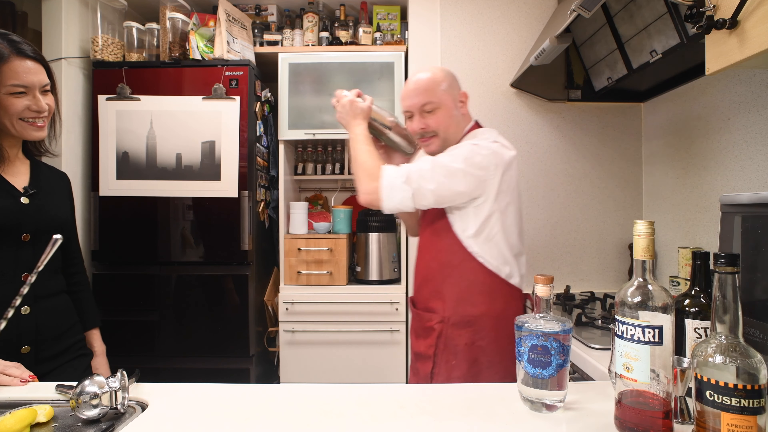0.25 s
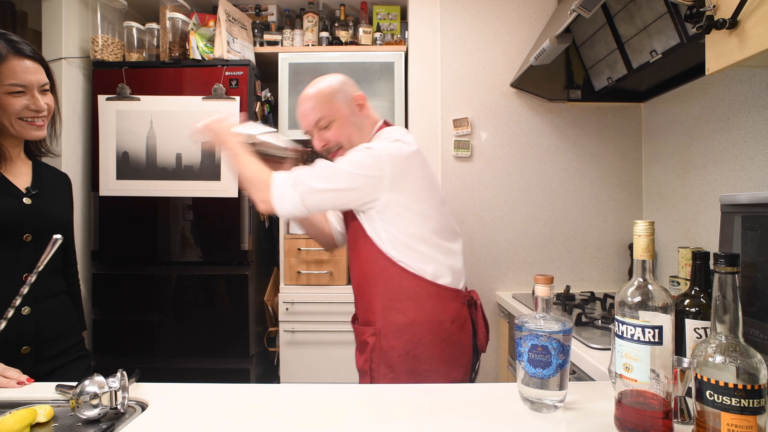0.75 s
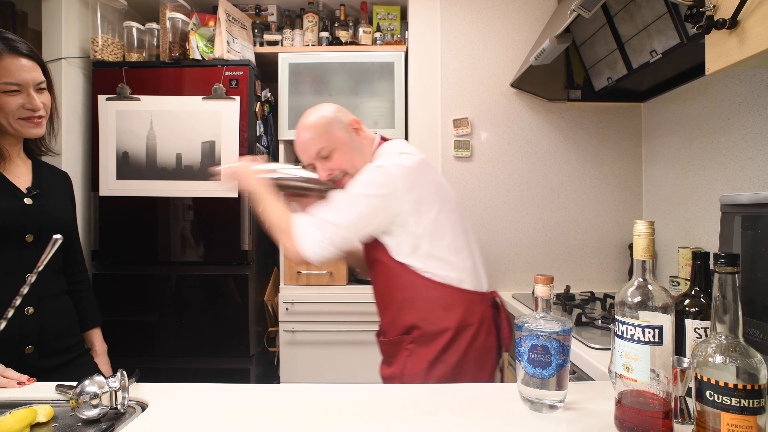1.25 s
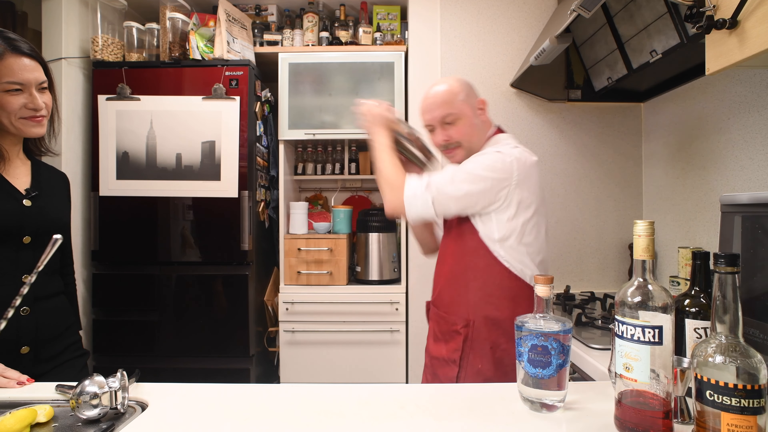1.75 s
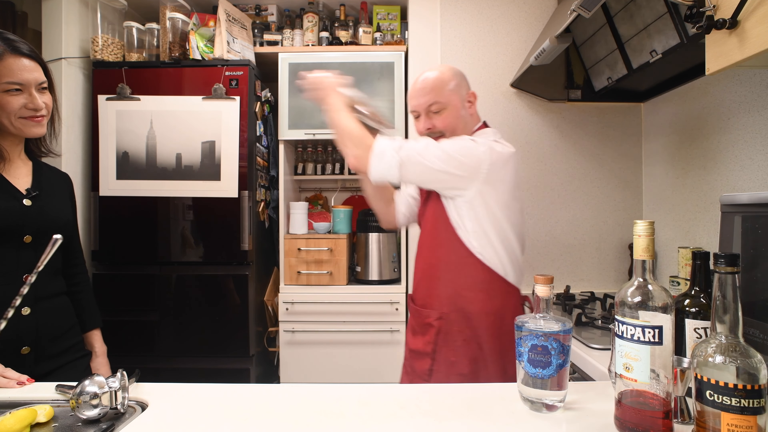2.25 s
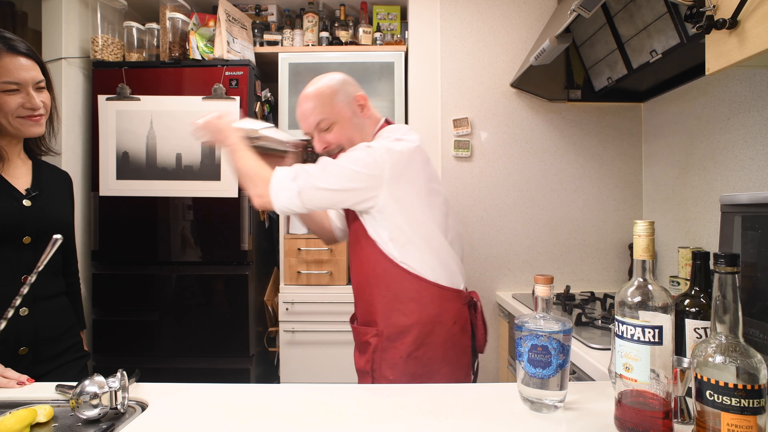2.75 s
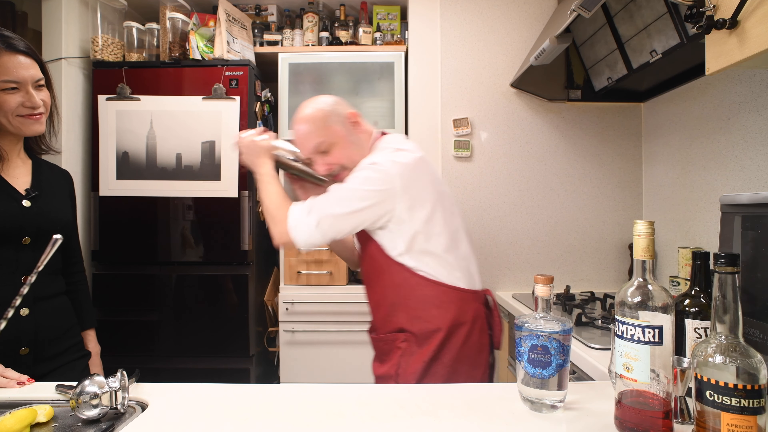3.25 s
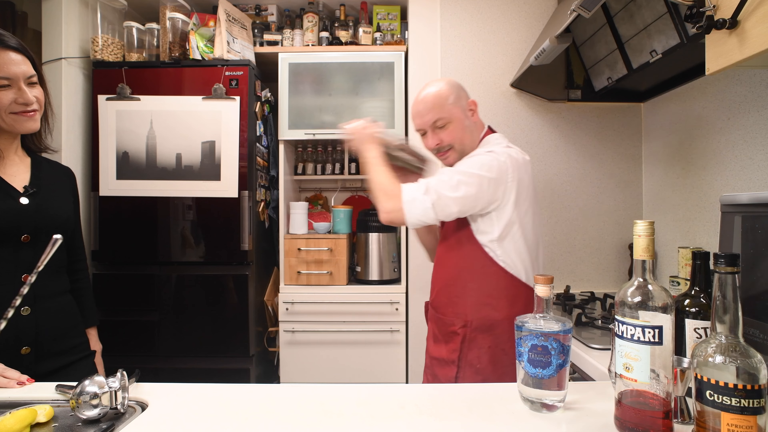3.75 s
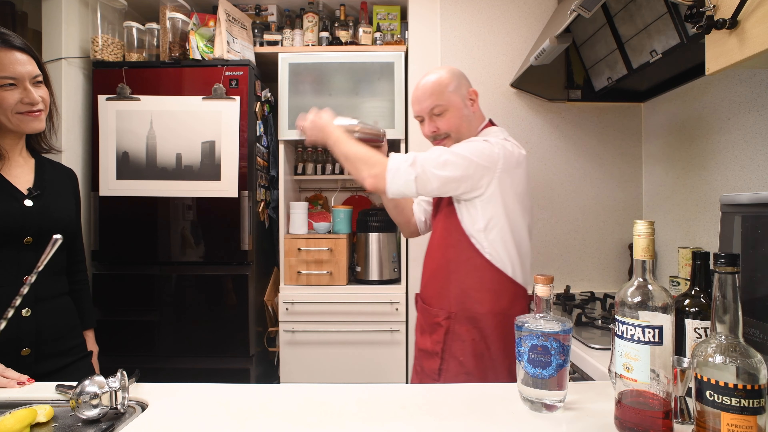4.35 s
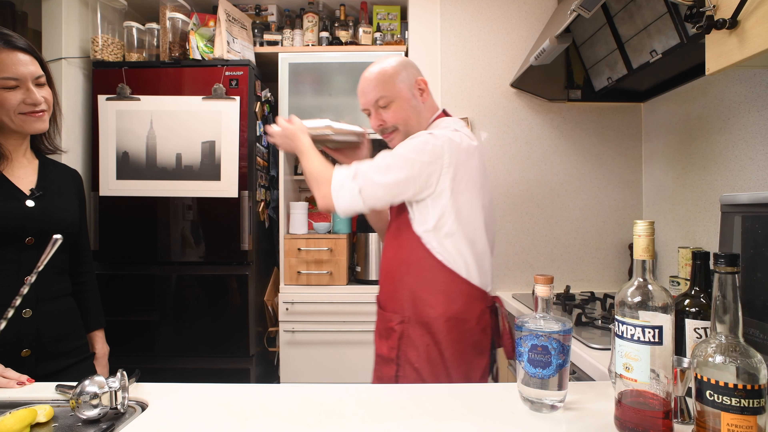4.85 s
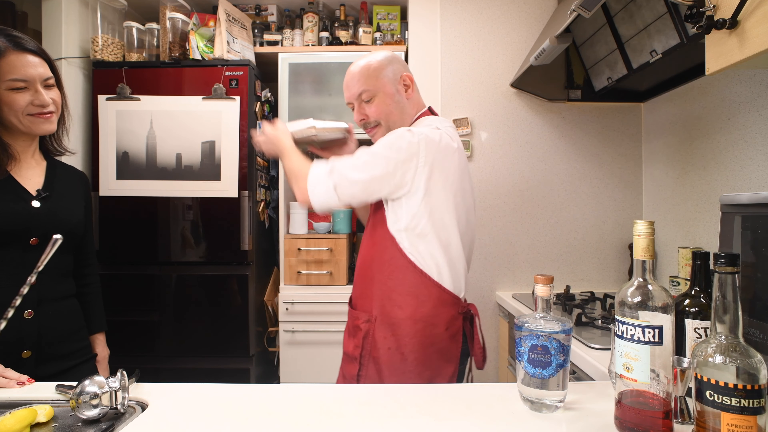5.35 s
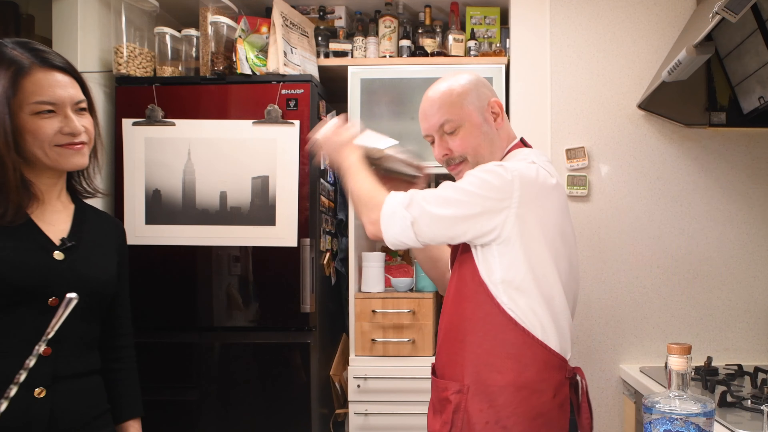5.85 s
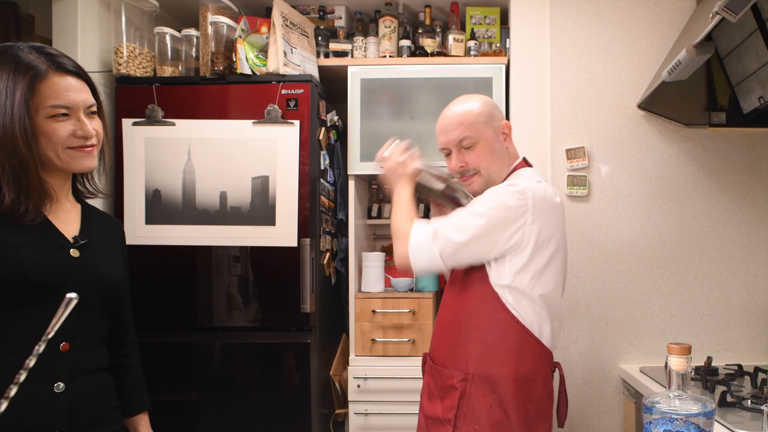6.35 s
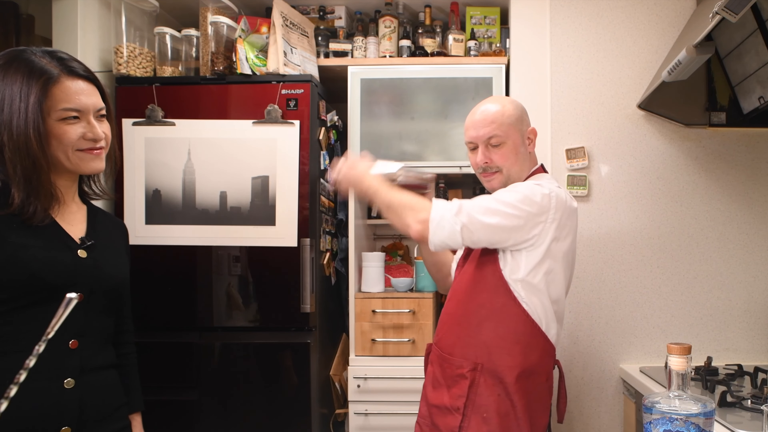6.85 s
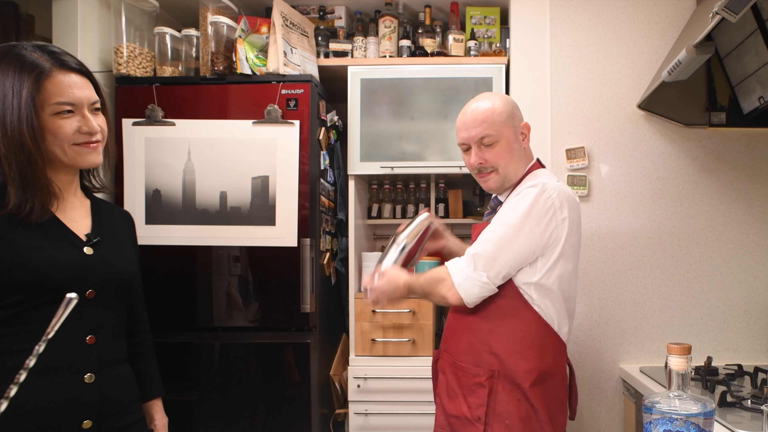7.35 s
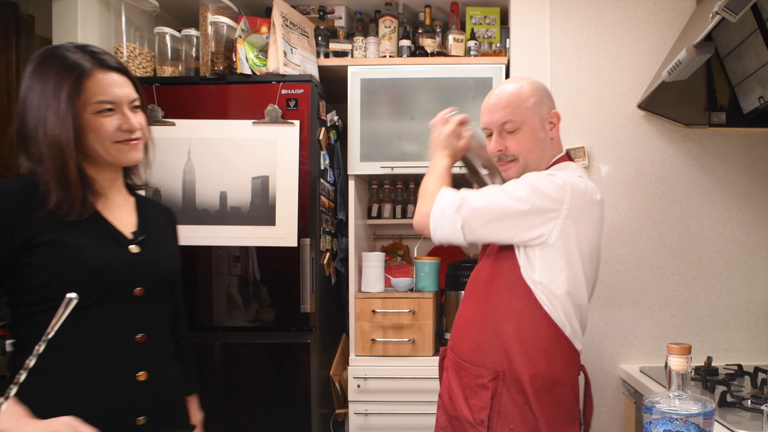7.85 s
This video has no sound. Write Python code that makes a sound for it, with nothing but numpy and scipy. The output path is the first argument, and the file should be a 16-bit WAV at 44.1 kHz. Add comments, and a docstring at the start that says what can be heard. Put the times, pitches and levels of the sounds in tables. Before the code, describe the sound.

A steel shaker full of ice is shaken furiously, close to ten blows a second, each a dull metallic clank followed by a quick crunchy rattle, with liquid sloshing between. After about four seconds the blows become more uneven and gaps open; from six seconds it is lighter and sparser, with a few late stronger clacks. Small hard-walled kitchen, short bright reflections, stereo microphone slightly overloaded on the loudest hits.

```python
"""A hand-held steel cocktail shaker full of ice rattles in a small kitchen, hard at first, then easing off.
Each blow is a first contact and a rattle of lesser ones; each contact rings damped modes of the steel shell
and sets off short noise bursts for the crack of ice on ice. Between blows the ice rolls and the drink sloshes
as noise. Hard walls answer with decaying noise tails, over soft low bumps and low room air.
The loudest blows overload the stereo microphone."""
import sys
import numpy as np
from scipy import signal
from scipy.fft import rfft, irfft, next_fast_len
from scipy.io import wavfile

SR = 44100
rng = np.random.default_rng(int(sys.argv[2]) if len(sys.argv) > 2 else 0)


def wrap_up_sound(samples):
    """Save the sound to the file named by the first command line argument, as 16-bit audio."""
    columns = np.atleast_2d(samples).T
    # keep every value between -1 and 1, then stretch to whole-number steps
    tamed = np.clip(columns, -1, 1)
    steps = np.round(tamed * 32767).astype(np.int16)
    wavfile.write(sys.argv[1], SR, steps)


N = 357210  # samples in the scene


def amp(db):
    """Decibels to gain."""
    return 10 ** (np.asarray(db) / 20)


def unit(x):
    """Scaled to rms 1."""
    return x / np.sqrt(np.mean(x ** 2) + 1e-20)


def along(points, hz):
    """(Hz, value) points read on a log frequency axis."""
    point_hz, value = np.transpose(points)
    return np.interp(np.log(hz + 1), np.log(point_hz + 1), value)


def curve(rows, s):
    """A (s, value) table read at times s."""
    return np.interp(s, *np.transpose(rows))


def filtered(x, response):
    """x shaped by a complex response of frequency."""
    size = next_fast_len(N + SR // 2)
    spectrum = rfft(x, size) * response(np.fft.rfftfreq(size, 1 / SR))
    return irfft(spectrum, size)[..., :N]


def train(s, size):
    """Impulses of the given sizes at times s."""
    sample = np.clip(np.round(s * SR).astype(int), 0, N)
    return np.bincount(sample, size, N + 1)[:N]


# Blows of the ice pile, each followed by a rattle; low_db and treble_db are the lows and treble against level_db,
# and only their distance from the median blow is used:
# start_s [s], level_db [dB], rattle_t60_s [s], low_db [dB], treble_db [dB]
BLOWS = [(0.027, 1, 0.38, -19, -15), (0.139, 4.5, 0.29, -21.5, -18.5), (0.253, 0.5, 0.26, -15, -14),
         (0.298, -2.5, 0.29, -20, -20.5), (0.343, -4.5, 0.48, -19, -6), (0.378, -2, 0.2, -17.5, -16.5),
         (0.44, -2, 0.53, -12, -10.5), (0.536, -5, 0.35, -27, -14), (0.579, 0, 0.3, -14.5, -11.5),
         (0.64, -4.5, 0.3, -22, -15.5), (0.674, 0.5, 0.23, -17, -11), (0.754, -10, 0.35, -21, -11),
         (0.777, -8.5, 0.49, -13, -8), (0.8, -3.5, 0.89, -20, -15), (0.878, -3.5, 0.43, -23, -14.5),
         (0.899, -4, 0.17, -22, -20), (0.962, -11.5, 0.32, -26, -14), (0.992, -3, 6.0, -18, -12),
         (1.015, -2, 0.28, -21, -15.5), (1.053, -2.5, 0.83, -13, -16.5), (1.086, 0, 0.22, -13, -10),
         (1.166, -1.5, 2.3, -18.5, -14.5), (1.27, -4, 1.2, -20, -12), (1.3, 1, 0.39, -22.5, -20.5),
         (1.41, 2.5, 0.18, -17, -13.5), (1.47, -3, 0.73, -22, -10.5), (1.503, 1.5, 0.36, -21.5, -13.5),
         (1.595, -1.5, 0.36, -20, -14.5), (1.622, 1.5, 0.59, -23, -13.5), (1.696, 5, 0.24, -14, -15.5),
         (1.786, -15, 0.34, -10, -10.5), (1.814, 1, 0.83, -16.5, -14), (1.93, 1, 0.27, -17.5, -14.5),
         (2.016, -10, 0.28, -19, -11.5), (2.044, -1, 0.37, -16, -12), (2.134, 2, 0.4, -14.5, -14.5),
         (2.231, -4, 0.59, -19, -12), (2.255, 3.5, 0.38, -16.5, -12.5), (2.354, 0, 1.5, -18, -14),
         (2.378, 7, 0.3, -17.5, -25.5), (2.499, 1, 0.36, -11.5, -14), (2.591, -5, 0.14, -13, -18),
         (2.62, -0.5, 0.26, -19, -12.5), (2.729, -12.5, 0.28, -22, -13), (2.751, -3.5, 0.76, -13.5, -11.5),
         (2.797, 0.5, 0.18, -26, -19), (2.833, -6.5, 6.0, -34, -18), (2.888, 2.5, 0.41, -23.5, -19),
         (3.007, 0, 0.97, -15, -16), (3.043, -0.5, 0.21, -16, -7.5), (3.137, -9, 6.0, -16.5, -15),
         (3.165, 0, 0.39, -20, -15.5), (3.29, -21, 2.6, -11, -16), (3.312, -7, 0.37, -19, -11),
         (3.338, 1, 0.17, -19.5, -19), (3.36, 2, 0.22, -18, -17.5), (3.423, -4, 6.0, -14, -13.5),
         (3.447, 2, 0.5, -19.5, -17.5), (3.581, -5.5, 0.48, -13, -18), (3.612, 1.5, 0.8, -26, -17),
         (3.773, -5, 0.36, -11.5, -19.5), (3.853, -20, 1.5, -26, -29), (3.904, -15, 6.0, -11.5, -4),
         (3.937, -3, 6.0, -13.5, -15.5), (3.992, -3.5, 0.11, -18, -12.5), (4.029, -13, 1.3, -22.5, -20),
         (4.077, -4, 0.4, -6.5, -14.5), (4.115, -8, 0.12, -8, -4), (4.217, -26, 6.0, -18, -12),
         (4.254, -14.5, 6.0, -9.5, -11), (4.289, -3, 0.34, -16, -11.5), (4.382, -15, 0.12, -22, -34),
         (4.408, -16, 6.0, -14, -13), (4.433, 2, 0.23, -25, -18), (4.466, 0.5, 0.39, -21, -23.5),
         (4.526, -6, 0.2, -16, -18), (4.621, -7.5, 0.22, -13, -12.5), (4.654, -13, 0.57, -19, -8.5),
         (4.699, 1.5, 0.27, -19, -17), (4.824, -16, 0.54, -14, -25), (4.869, -5, 6.0, -20, -17),
         (4.908, -2, 0.39, -24, -20), (4.944, -6, 0.23, -15.5, -17.5), (5.019, -24, 0.54, -17, -32),
         (5.108, -23, 0.86, -19, -5.5), (5.158, -8.5, 6.0, -16, -14), (5.183, 0, 0.28, -22, -19),
         (5.24, -10.5, 0.26, -17, -19), (5.327, -21, 0.4, -22, -18), (5.381, -22.5, 0.4, -16, -15),
         (5.419, -8, 0.22, -13, -17.5), (5.449, -8.5, 0.29, -17, -20.5), (5.53, -26, 0.5, -16, -27),
         (5.609, -16, 0.2, -13, -10.5), (5.665, -15, 0.34, -11, -17), (5.702, -3, 0.41, -16, -19.5),
         (5.951, -25, 0.06, -18, -36), (5.992, -19, 0.072, -15, -33), (6.022, -18.5, 0.4, -13.5, -19.5),
         (6.05, -6.5, 0.26, -16, -23.5), (6.088, -9.5, 0.43, -10.5, -19), (6.126, -7.5, 0.24, -13, -15),
         (6.254, -24.5, 0.13, -3, -6.5), (6.316, -14.5, 0.11, -20, -18), (6.372, -24.5, 0.19, -9, -21),
         (6.4, -29, 0.14, -16, -17), (6.441, -48, 2.4, -7, -4), (6.482, -15.5, 0.12, -10, -15),
         (6.521, -23, 6.0, -13, -17), (6.545, -10.5, 0.28, -11, -16), (6.622, -17, 6.0, -20, -16),
         (6.644, -8, 0.38, -22, -17), (6.726, -12.5, 0.32, -16.5, -19), (6.77, -17, 0.12, -13, -16),
         (6.834, -10.5, 0.053, -25, -29), (6.865, -16.5, 0.19, -21, -26), (6.897, -20, 0.18, -17, -29),
         (6.971, -10.5, 0.083, -19, -24), (7.082, -17.5, 6.0, -10, -15.5), (7.107, -11, 0.16, -14, -9.5),
         (7.131, -9.5, 0.26, -11, -16), (7.164, -7, 0.25, -14, -15), (7.359, -21, 0.047, -20, -19.5),
         (7.389, -21, 0.15, -16, -15.5), (7.525, -27, 0.16, -3, -21), (7.558, -26.5, 0.13, -15, -16),
         (7.612, -28, 0.56, -13, -27), (7.635, -30, 1.0, -12, -32), (7.678, -19, 0.077, -17, -18),
         (7.76, -29.5, 0.34, -15, -13.5), (7.812, -20.5, 0.2, -17, -18), (7.845, -25.5, 0.19, -14, -5),
         (7.914, -5.5, 0.33, -16, -14), (7.972, -9.5, 0.24, -18, -16.5), (8.082, -29, 0.22, -9, -31)]
# Usual drive of the low, body, cap and treble parts of the shell: drive_db [dB]
PARTS_DB = [-9.5, -1, -8, -6.5]
# How far each of the four parts follows a bright blow: share [dB per dB]
FOLLOWS_TREBLE = [0, 0.22, 0.53, 0.96]
FOLLOWS_LOW = 0.83  # how far the low part follows a deep blow, dB per dB
SCATTER_DB = 2.5  # chance scatter of the parts from blow to blow
FIRST_DB, RATTLE_DB = -2.5, -7.5  # first contact, and base level of the rattle, against the blow's level
STRAGGLE_DB = 12  # extra loss per rattle length once the rattle is over
GAP_SHARE, LONGEST_S = 0.55, 0.05  # a rattle fills this share of the wait for the next blow, up to a limit
USUAL_RATTLE_S = 0.024


def rattle_contacts(count, spread_db, reach):
    """Ice thrown against one end: time, dB, blow number and the drive of each shell part, per contact."""
    s, level_db, t60, low_db, treble_db = np.transpose(BLOWS)[..., None]
    length = np.minimum(GAP_SHARE * np.diff(s, axis=0, append=N / SR), LONGEST_S)
    draw = rng.random((len(s), 2, count))
    # one contact in each equal slot, in rattle lengths; the first is the blow itself
    when = reach * (np.arange(count) + draw[:, 0]) / count
    when[:, 0] = 0
    rattle_db = RATTLE_DB - 60 * length * np.minimum(when, 1) / t60
    # a longer rattle spreads the same number of contacts wider, so each must be stronger
    rattle_db = rattle_db + 10 * np.log10(length / USUAL_RATTLE_S)
    rattle_db = rattle_db - STRAGGLE_DB * np.maximum(when - 1, 0)
    rattle_db = rattle_db - spread_db * np.log(draw[:, 1] + 0.027)
    contact_db = level_db + np.where(when == 0, FIRST_DB, rattle_db)
    scatter = SCATTER_DB * rng.standard_normal((len(s), len(PARTS_DB)))
    parts_db = PARTS_DB + (treble_db - np.median(treble_db)) * FOLLOWS_TREBLE + scatter
    parts_db[:, :1] += FOLLOWS_LOW * (low_db - np.median(low_db))
    rows = [s + length * when, contact_db, np.arange(len(s))[:, None], *parts_db.T[..., None]]
    return [np.broadcast_to(row, when.shape).ravel() for row in rows]


# Ice rolling between blows, before it settles: time_s [s], level_db [dB]
TUMBLE = [(0.0, -11.5), (1.17, -12.5), (2.1, -11), (2.6, -12.5), (2.73, -18.5), (2.84, -12.5), (3.41, -16),
          (3.56, -17), (3.72, -7), (3.85, -19.5), (4.3, -20.5), (4.6, -24), (5.68, -26), (5.92, -30.5),
          (6.48, -45), (6.68, -32), (7.4, -33.5), (7.62, -41.5), (8.1, -33)]
SETTLE_DB_PER_S, SETTLE_MOST_DB = 99, 4.5  # rolling quietens after each blow, down to a limit


def rolling_db(t):
    """Level of the rolling ice: the slow curve, settling since the latest blow."""
    s = np.transpose(BLOWS)[0]
    since = t - s[np.maximum(np.searchsorted(s, t) - 1, 0)]
    return curve(TUMBLE, t) - np.clip(SETTLE_DB_PER_S * since, 0, SETTLE_MOST_DB)


# Rolling ice's drive of the low, body, cap and treble parts of the shell: drive_db [dB]
ROLL_PARTS_DB = [-7.5, 0, -7, -5]


def rolling_contacts(rate, spots, spread_db):
    """Loose ice touching the steel at random times, taking turns on a few spots."""
    s = rng.random(round(rate * N / SR)) * N / SR
    db = rolling_db(s) - spread_db * np.log(rng.random(len(s)) + 0.32)
    spot = len(BLOWS) + np.arange(len(s)) % spots
    return [np.broadcast_to(row, s.shape) for row in [s, db, spot, *ROLL_PARTS_DB]]


def contacts(count, rate, spread_db, reach):
    """Every touch of ice on steel, rattling or rolling: time, dB, blow or spot, dB for each shell part."""
    rattle = rattle_contacts(count, spread_db, reach)
    rolling = rolling_contacts(rate, count, spread_db)
    s, db, blow, *parts_db = [np.concatenate(pair) for pair in zip(rattle, rolling)]
    return s, db, blow, np.array(parts_db)


# Centres of the low, body, cap and treble parts of the shell: centre_hz [Hz]
PARTS_HZ = [600, 1600, 3000, 7000]


def part_share(hz):
    """How much of each frequency belongs to each part of the shell, cross-fading between centres."""
    return np.array([along(list(zip(PARTS_HZ, row)), hz) for row in np.eye(len(PARTS_HZ))])


def ring(push, hz, t60):
    """One damped mode: a two-pole resonator driven by impulses."""
    radius, angle = amp(-60 / t60 / SR), 2 * np.pi * hz / SR
    return signal.lfilter([0, radius * np.sin(angle)], [1, -2 * radius * np.cos(angle), radius ** 2], push)


# Modes of the hand-damped steel shell, each pulled flat or sharp as it plays:
# centre_pitch_hz [Hz], level_db [relative dB], t60_s [s]
SHELL = [(290, -5, .05), (395, 5, .07), (480, 4, .06), (570, 8, .05), (700, 8, .05), (860, 7, .04),
         (1080, 2, .05), (1270, 5, .05), (1480, 1, .045), (1680, 1, .05), (1850, 1, .045), (2300, -4, .02),
         (2780, 7, .035), (2940, 8, .035), (3250, 5, .03), (4740, -3, .007), (5050, -1, .008),
         (5700, -3, .006), (6600, -8, .004)]


def shell(s, db, blow, parts_db, spot_db, detune):
    """Each blow lands on its own spot; the drink inside pulls every mode flat or sharp."""
    sound = np.zeros(N)
    for hz, level_db, t60 in SHELL:
        spot = rng.uniform(-1, 1, blow.max() + 1)[blow]
        sharp = rng.integers(2, size=blow.max() + 1)[blow]
        mode_db = db + part_share(hz) @ parts_db + level_db - 19.5 + spot_db * spot
        # chance sign and strength for each contact
        size = amp(mode_db) * np.cos(np.pi * rng.random(len(s)))
        sound += ring(train(s, size * sharp), hz * (1 + detune), t60)
        sound += ring(train(s, size * (1 - sharp)), hz * (1 - detune), t60)
    return sound


# Colour of ice on ice and slosh: freq_hz [Hz], level_db [relative dB per Hz]
CRACK = [(150, -58), (250, -21), (354, -10), (555, 2), (1050, 8), (1300, 8.5), (2180, 3), (2880, 2),
         (3730, -3), (5750, -7), (15700, -26.5)]
# Crack in the low, body, cap and treble parts: level_db [relative dB], t60_s [s]
BURSTS = [(4.5, 0.032), (-3.5, 0.03), (5.5, 0.028), (13.5, 0.021)]
# Likeness of the crack at the two capsules: freq_hz [Hz], likeness [0-1]
ALIKE = [(300, 0.63), (3000, 0.93), (8000, 0.7), (15000, 1)]
SLOSH_DB = -4.5  # the drink against the rolling ice


def crack(s, db, parts_db):
    """Decaying noise bursts of ice on ice over the slosh; shared and unshared signals for the two capsules."""
    slosh = amp(rolling_db(np.arange(N) / SR) + SLOSH_DB)
    out = np.zeros((2, N))
    for k, (part_db, (level_db, t60)) in enumerate(zip(parts_db, BURSTS)):

        def colour(hz):
            """This part's spectrum, split into shared and unshared by the likeness."""
            gain = part_share(hz)[k] * amp(level_db + along(CRACK, hz))
            turn = np.arccos(np.clip(along(ALIKE, hz), 0, 1)) / 2
            return gain * [np.cos(turn), np.sin(turn)]

        # bursts and slosh add as power
        burst_power = signal.lfilter([1], [1, -amp(-2 * 60 / t60 / SR)], train(s, amp(2 * (db + part_db))))
        slosh_power = (slosh * amp(ROLL_PARTS_DB[k])) ** 2
        noise = np.sqrt(burst_power + slosh_power) * rng.standard_normal((2, N))
        out += filtered(noise, colour)
    return out


# Phase between the capsules: freq_hz [Hz], left_lead_rad [radians]
LEAD = [(5000, 0.03), (9000, 4.5), (10800, -9), (11500, -1.5), (16000, -2)]


def at_capsules(ice, apart):
    """Direct sound at left and right: unshared crack in opposite signs, half the phase lead on each side."""
    sides = np.array([1, -1])
    return filtered(ice + np.outer(sides, apart), lambda hz: np.exp(.5j * np.outer(sides, along(LEAD, hz))))


# The shaker's swing: time_s [s], left_minus_right_db [dB]
PLACE = [(0.0, -0.5), (1.2, 3), (1.98, -1.5), (2.89, 2.5), (3.95, -1.0), (5.44, 1), (5.77, 0.5), (5.98, 1),
         (6.65, -0.5), (6.81, 0.5), (7.56, 1.0), (8.1, -2.0)]


def swing(x):
    """Left and right levels tilt against each other as the shaker swings."""
    pan_db = curve(PLACE, np.arange(N) / SR)
    return amp(np.outer([.5, -.5], pan_db)) * x


# Decay of the kitchen: freq_hz [Hz], t60_s [s]
WALLS = [(300, 0.19), (2000, 0.26), (6000, 0.11), (15000, 0.067)]
# Kitchen against direct sound: freq_hz [Hz], level_db [dB]
WET = [(200, -6.5), (1000, -8.5), (4000, -3), (12000, -4)]


def kitchen(x, count):
    """The walls' answer as decaying noise; the shaker keeps moving, so each stretch gets a new tail."""
    out, hop = np.zeros((2, N + SR)), -(-N // count)
    for k in range(count):
        hz, t, grain = signal.stft(rng.standard_normal((2, SR // 4)), SR, nperseg=128)
        t60 = along(WALLS, hz)[:, None]
        # dividing by the decay's own energy keeps the level apart from the length
        shape = amp(along(WET, hz)[:, None] - 60 * t / t60) / np.sqrt(t60 * SR / np.log(1e6))
        tail = signal.istft(grain * shape, SR, nperseg=128)[1]
        answer = signal.fftconvolve(x[None, k * hop:(k + 1) * hop], tail, axes=1)
        start = k * hop + round(.003 * SR)  # 3 ms to the walls and back
        out[:, start:start + answer.shape[1]] += answer
    return out[:, :N]


# Soft low bumps: start_s [s], peak_db [approximate dB], pitch_hz [Hz], t60_s [s]
BUMPS = [(5.158, -40, 184, 0.19), (6.33, -43.5, 155, 0.14), (6.934, -44, 144, 0.13),
         (7.442, -34.5, 157, 0.087)]


def bumps():
    """Short low sines with a soft onset, as of weight shifting on the floor."""
    out, t = np.zeros(N + SR), np.arange(SR // 2) / SR
    for s, peak_db, hz, t60 in BUMPS:
        # 8.5 dB makes up for what the soft onset takes off the peak
        swell = amp(peak_db + 8.5 - 60 * t / t60) * (1 - np.exp(-t / 0.016))
        out[round(s * SR):][:len(t)] += swell * np.sin(2 * np.pi * hz * t)
    return out[:N]


# Colour of the room air: freq_hz [Hz], level_db [relative dB per Hz]
AIR = [(20, -40), (38, -26), (60, -7.5), (120, -8), (300, -8.5), (1000, -5), (5000, -54), (16000, -35)]


def room_tone():
    """Low steady air of the kitchen: filtered noise, partly shared by both sides."""
    shared, apart = unit(filtered(rng.standard_normal((2, N)), lambda hz: amp(along(AIR, hz))))
    apart = .4 * apart
    return amp(-48.0) * np.array([shared + apart, shared - apart])


def scene():
    """Shaker, walls, bumps and room tone at the two capsules."""
    s, db, blow, parts_db = contacts(count=18, rate=250, spread_db=3.0, reach=1.6)
    s = s - .001  # every contact sounds 1 ms ahead of its listed time
    shared, apart = crack(s, db, parts_db)
    ice = shell(s, db, blow, parts_db, spot_db=7.5, detune=.025) + shared
    # a vessel this small radiates little bass
    small = signal.butter(3, 320, "high", fs=SR, output="sos")
    heard = signal.sosfilt(small, at_capsules(ice, apart) + kitchen(ice, count=110))
    return swing(heard) + bumps() + room_tone()


TOP_HZ = 15800  # nothing passes above this


def record(dry):
    """Soft overload, lopsided so that the loudest blows leave a low thump, then the band limit."""
    x = dry / (1 + abs(dry / .72) ** 4) ** (1 / 4)
    # the one-sided push passes through a 15 Hz high-pass
    x = x + filtered(0.32 * abs(x) ** 3, lambda hz: 1j * hz / (15 + 1j * hz))
    return np.clip(filtered(x, lambda hz: hz < TOP_HZ), -1, 1)


dry = scene()
out = record(dry)
wrap_up_sound(out)
```